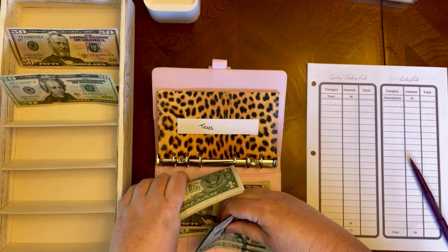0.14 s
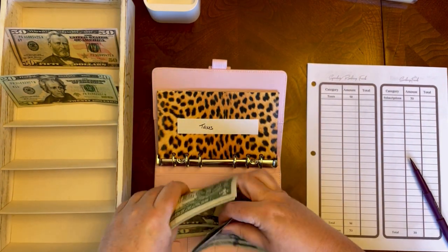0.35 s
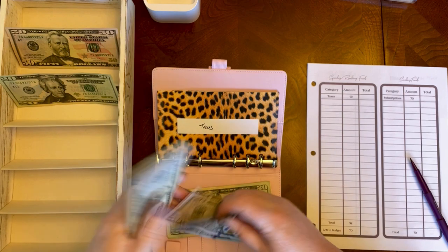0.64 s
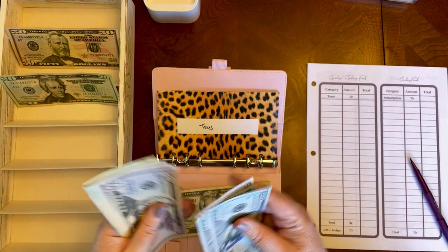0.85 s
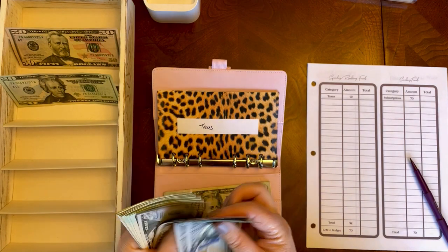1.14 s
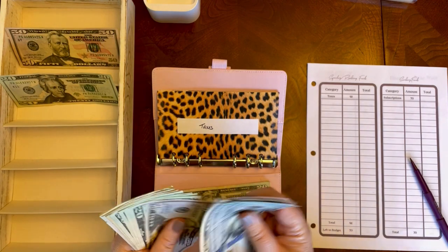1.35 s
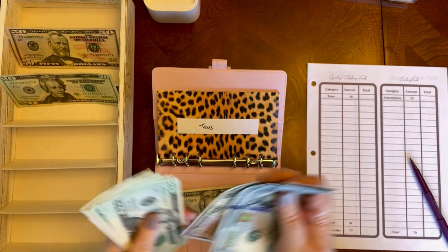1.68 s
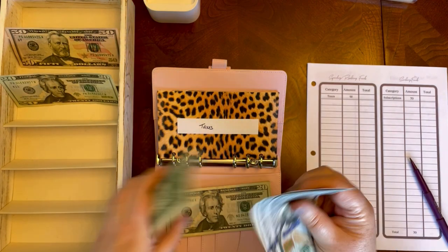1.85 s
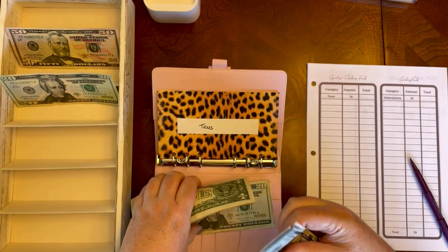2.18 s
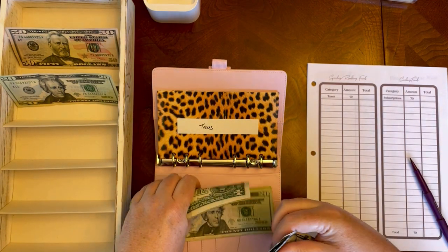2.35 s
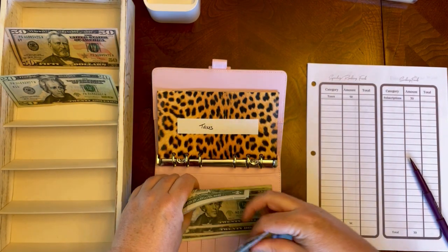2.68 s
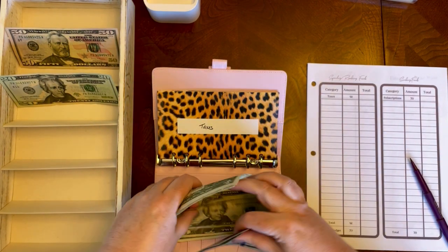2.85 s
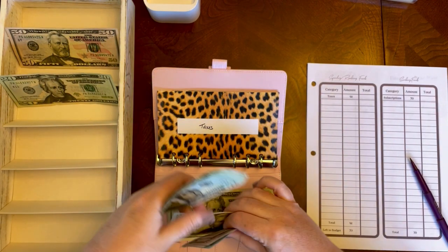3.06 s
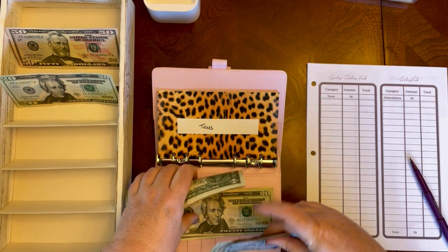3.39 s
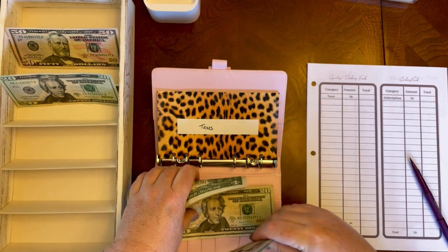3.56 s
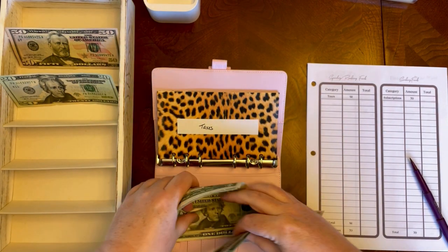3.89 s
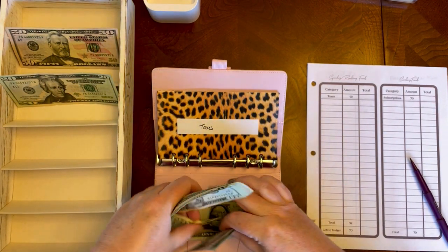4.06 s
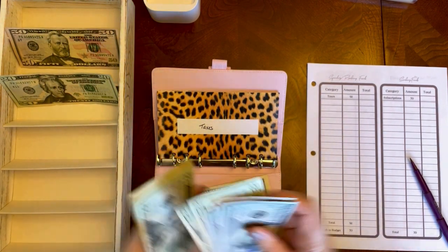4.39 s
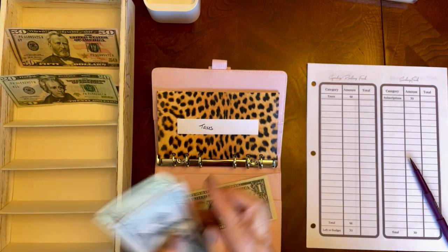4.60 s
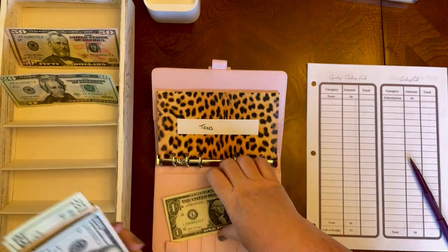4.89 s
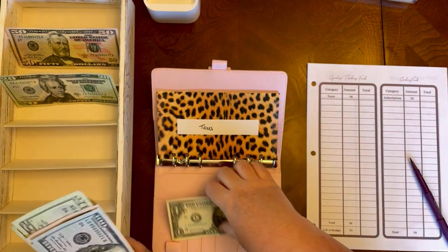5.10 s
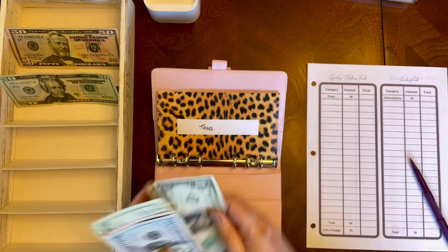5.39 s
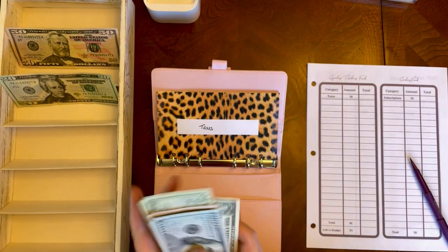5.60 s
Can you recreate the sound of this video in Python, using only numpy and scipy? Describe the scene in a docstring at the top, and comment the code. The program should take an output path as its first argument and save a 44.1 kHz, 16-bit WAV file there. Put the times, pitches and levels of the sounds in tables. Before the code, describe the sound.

Close dry rustling and snapping of paper money being sorted by hand, with a few finger taps and a soft steady appliance hum.

```python
"""Banknotes are sorted by hand over a binder on a table, close to the listener in a quiet room.
Throughout, wavering tones make an appliance hum, and filtered noise makes the air and a soft rustle.
From the start, notes slide and crinkle (random catches and pops) and scrape (resonances); a faint thin
whistle (a wavering, sinking tone) comes and goes. Snaps (noise bursts through three resonances) follow,
loudest near 0.6 and 1.5 s, and creases pop. Fingers tap the binder (ringing tones, a click) from 0.6 s."""
import sys
import numpy as np
from scipy import signal
from scipy.fft import rfft, irfft
from scipy.io import wavfile
from scipy.ndimage import uniform_filter1d

SR = 44100
rng = np.random.default_rng(int(sys.argv[2]) if len(sys.argv) > 2 else 0)


def store_pcm(level_fs):
    """Save levels as 16-bit WAV."""
    pcm = np.round(np.clip(level_fs, -1, 1) * 32767).astype(np.int16)
    wavfile.write(sys.argv[1], SR, np.atleast_2d(pcm).T)


N = 253134
TIME = np.arange(N) / SR


def from_db(db):
    """Turn decibels into a gain."""
    return np.exp(np.asarray(db) * (np.log(10) / 20))


def rms_one(x):
    """Scale a sound to an average (rms) strength of 1."""
    return x / np.sqrt(np.mean(x ** 2) + 1e-20)


def at_hz(points, hz):
    """Read a spectrum between its points, on a log-frequency axis."""
    f, db = np.transpose(points)
    return np.interp(np.log(np.maximum(hz, 1)), np.log(f), db)


def drift(rate):
    """Wander at random with strength 1, taking a new target rate times a second."""
    knots = rng.standard_normal(int(N / SR * rate) + 2)
    return rms_one(np.interp(TIME * rate, np.arange(len(knots)), knots))


def cut(x, hz, kind, order=2):
    """Keep only part of the pitch range (Butterworth filter)."""
    return signal.sosfilt(signal.butter(order, hz, kind, fs=SR, output="sos"), x)


def band(x, hz, ratio):
    """Let through a broad resonance from hz / ratio to hz * ratio."""
    return cut(x, [hz / ratio, hz * ratio], "band")


def resonate(x, hz, width_hz):
    """Ring at one pitch; white noise comes out equally strong at any width."""
    r, w = np.exp(-np.pi * width_hz / SR), 2 * np.pi * hz / SR
    ringing = signal.lfilter([1, 0, -1], [1, -2 * r * np.cos(w), r * r], x + 1e-18)
    return ringing * np.sqrt(1 - r)


def colour(x, spectrum, size=8192):
    """Filter a sound to follow a spectrum, responding as early as possible (minimum phase)."""
    gains = from_db(at_hz(spectrum, np.fft.rfftfreq(size, 1 / SR)))
    cepstrum = irfft(np.log(gains))
    # fold the mirrored half forward so that nothing sounds before its cause
    cepstrum[1:size // 2] *= 2
    cepstrum[size // 2 + 1:] = 0
    return signal.fftconvolve(x, irfft(np.exp(rfft(cepstrum))))[:len(x)]


def add(out, s, sound):
    """Mix a short sound in at time s."""
    at = max(round(s * SR), 0)
    out[at:at + len(sound)] += sound[:max(N - at, 0)]


# tones of the appliance motor: pitch_hz, level_db (rms, before wavering)
HUM_TONES = [(55.5, -47), (117.2, -50.5), (145.3, -54), (234.4, -57.5), (351.5, -54)]


def hum(waver_db=1.0, wander_rad=0.05):
    """Motor and mains tones, each wavering a little in level and phase."""
    out = np.zeros(N)
    for hz, db in HUM_TONES:
        gain = np.sqrt(2) * from_db(db + waver_db * drift(7))
        phase = 2 * np.pi * (hz * TIME + rng.random()) + wander_rad * drift(14.0)
        out += gain * np.sin(phase)
    return out


# colour of the air in the room: pitch_hz, level_db (per hertz, relative)
AIR_COLOUR = [(30, -19.5), (48, 0), (75, 4.5), (105, -5.5), (140, -4), (190, -8.5), (330, -10.5),
              (520, -15.5), (2600, -24.2), (3800, -31), (11000, -38), (16000, -42)]


def room_air(level_db=-47.5):
    """Steady air noise: random pressure, strongest in the bass."""
    return from_db(level_db) * rms_one(colour(rng.standard_normal(N), AIR_COLOUR))


# colour of the handled paper: pitch_hz, level_db (per hertz, relative)
PAPER_COLOUR = [(300, -4.5), (620, -2), (1000, -2.5), (1540, 0.6), (3000, 2.2), (3800, -3), (4300, -3),
                (5400, -1.3), (7800, -3), (10000, -8), (12500, -12), (15000, -12.5)]


def through_paper(x):
    """The paper strengthens some pitches and weakens others."""
    return colour(x, PAPER_COLOUR)


def stroke(start, length, attack_s=0.024, release_s=0.015):
    """A stroke of the hand speeds up, holds and dies away."""
    attack = np.clip((TIME - start) / attack_s, 0, 1)
    return attack * np.exp(-np.clip((TIME - start - length) / release_s, 0, 20))


# one note slides over another: start_s, length_s, level_db (before each layer's trim),
# brightness_db (treble over bass, before the tilt that rubbing shapes)
SLIDING_STROKES = [(0.025, 0.064, -45, 0), (0.117, 0.28, -51, -2.5), (0.481, 0.076, -43, -3.5),
                   (0.568, 0.066, -44, 7), (0.765, 0.16, -52, 6), (0.938, 0.096, -49.5, 1),
                   (1.014, 0.13, -41, 4.5), (1.065, 0.029, -38, 9), (1.134, 0.14, -45.5, 3.5),
                   (1.276, 0.16, -47.5, 7), (1.467, 0.14, -40.5, -8), (1.486, 0.083, -38, 12.5),
                   (1.61, 0.22, -51.5, 7), (1.684, 0.036, -45, 9.5), (1.755, 0.022, -48, 14),
                   (1.902, 0.04, -56, 8), (2.211, 0.13, -50.5, -0.5), (2.265, 0.035, -44.5, -2),
                   (2.359, 0.024, -48, 5), (2.719, 0.089, -46.5, -12.5), (2.798, 0.14, -50, 0),
                   (2.961, 0.057, -45, -1), (3.047, 0.11, -47.5, 6), (3.109, 0.097, -46, 1),
                   (3.325, 0.034, -54.5, -1), (3.432, 0.021, -47.5, -3), (3.824, 0.13, -48, 0.5),
                   (3.954, 0.065, -48, 11.5), (4.067, 0.066, -50, 9), (4.192, 0.029, -46, 7.5),
                   (4.217, 0.34, -53.5, 11.5), (4.447, 0.039, -36.5, 6.5), (4.519, 0.049, -42.5, 7),
                   (4.643, 0.22, -60.5, 13), (5.059, 0.073, -43, -1), (5.128, 0.14, -51.5, -1),
                   (5.349, 0.058, -47, 6), (5.416, 0.077, -40.5, -2.5), (5.514, 0.028, -37, 0),
                   (5.55, 0.02, -36.5, 0), (5.614, 0.039, -44.5, 2), (5.7, 0.039, -40.5, -1.5)]


def sliding(hold_db=-58):
    """Add up the power of all strokes over a soft, steady rustle; give level and brightness in dB."""
    power, bright = from_db(hold_db) ** 2, 0
    for start, length, db, brightness in SLIDING_STROKES:
        push = (from_db(db) * stroke(start, length)) ** 2
        power = power + push
        bright = bright + push * brightness
    return 10 * np.log10(power), bright / power


def friction(catches_per_s, spread_db, smooth):
    """Fibres catch and let go at random, over the smooth hiss of countless finer contacts."""
    sizes = from_db(spread_db * np.minimum(rng.exponential(1, N), 4))
    catches = (rng.random(N) < catches_per_s / SR) * sizes * rng.choice([-1, 1], N)
    return rms_one(rms_one(catches) + smooth * rng.standard_normal(N))


def rubbing(level, brightness, level_db=-1.0, judder_db=1.53, flex_db=2.16, pivot_hz=3500,
            lean=0.75, steepness=1.18, sizzle=0.12, gentle_db=-47, count=16):
    """Notes slide under uneven pressure: pressed strokes are dull, quick light ones bright."""
    faces = []
    for _ in range(2):
        fibres = friction(catches_per_s=3000, spread_db=2.0, smooth=0.71)
        faces.append(rms_one(through_paper(fibres)))
    edges = np.geomspace(400, 17000, count + 1)
    out = np.zeros(N)
    for k in range(count):
        hz = np.sqrt(edges[k] * edges[k + 1])
        tilt = lean * np.tanh(steepness * np.log(hz / pivot_hz)) * brightness
        # a hard stroke tears the fibres apart faster, which lifts the top; a gentle one has less
        top = sizzle * max(np.log2(hz / (2 * pivot_hz)), 0) * (level - gentle_db)
        # the sheet's resonances come and go as it bends between the fingers
        flex = flex_db * drift(45)
        # neighbouring bands take turns between the two faces
        out += cut(faces[k % 2], edges[k:k + 2], "band") * from_db(tilt + top + flex)
    return out * from_db(level + level_db + judder_db * drift(110))


def crinkles(level, brightness, smoothing=0.25, per_s=170, level_db=-6.5, spread_db=0.5, q=1.3,
             pop_s=0.00089, low_hz=1200, high_hz=9000, count=10):
    """Small creases pop at random, each a brief crunch at one pitch; pressed strokes crinkle most."""
    sizes = from_db(spread_db * np.minimum(rng.exponential(1, N), 3))
    creases = sizes * (rng.random(N) < per_s / SR)
    dealt = rng.integers(0, count, N)  # which pitch each crease gets
    grit, out = rng.standard_normal(N), np.zeros(N)
    for k, hz in enumerate(np.geomspace(low_hz, high_hz, count)):
        crunch = signal.lfilter([1], [1, -np.exp(-1 / (pop_s * SR))], creases * (dealt == k) + 1e-18)
        out += resonate(crunch * grit, hz, hz / q)
    return rms_one(through_paper(out)) * from_db(level + level_db - smoothing * brightness)


# a note's edge scrapes along a bowed note: start_s, length_s, level_db
EDGE_SCRAPES = [(0.043, 0.077, -53), (2.239, 0.045, -46.5), (3.311, 0.072, -52.5), (3.428, 0.027, -52)]
# the bowed note's resonances: pitch_hz, width_hz, level_db (relative)
BOWED_RESONANCES = [(2510, 260, -14), (3240, 160, -1), (5140, 280, 2), (7200, 240, -2.5)]


def scrapes():
    """The catching edge sets the bowed note singing faintly."""
    edge = friction(catches_per_s=1400, spread_db=3.0, smooth=0.5)
    note = rms_one(sum(from_db(db) * resonate(edge, hz, width) for hz, width, db in BOWED_RESONANCES))
    return note * sum(from_db(db) * stroke(start, length) for start, length, db in EDGE_SCRAPES)


# a faint thin whistle: start_s, length_s, pitch_hz (mid-whistle, before wobble),
# level_db (of the tone's peak, before flutter)
FAINT_WHISTLES = [(0.07, 0.092, 4450, -58), (0.148, 0.25, 4140, -53.5), (0.41, 0.094, 3970, -50),
                  (3.4, 0.25, 4100, -60.5), (3.66, 0.079, 3880, -58.5)]


def whistles(sag_hz_per_s=120, waver_hz=18, rough_hz=90, flutter_db=2.6, fade_s=0.014):
    """A faint thin whistle near 4 kHz, wavering and sinking in pitch."""
    out = np.zeros(N)
    wobble_hz = waver_hz * drift(50) + rough_hz * drift(970)
    flutter = flutter_db * drift(55)
    for start, length, hz, db in FAINT_WHISTLES:
        on = (TIME >= start) & (TIME < start + length)
        t = TIME[on] - start
        pitch = hz - sag_hz_per_s * (t - length / 2) + wobble_hz[on]
        swell = np.clip(np.minimum(t, length - t) / fade_s, 0, 1)
        tone = np.sin(2 * np.pi * np.cumsum(pitch) / SR)
        add(out, start, from_db(db + flutter[on]) * swell * tone)
    return out


def slips(slip_s, abrupt_s=0.0011, rise_share=0.44, ring_s=0.0035, ring_db=-13, size=1024, count=17):
    """A rush of tiny slips swells and dies; an abrupt buckle starts with a crack."""
    t = TIME[:size]
    fall = np.exp(-(t / (2 * slip_s)) ** 2) + from_db(ring_db) * np.exp(-t / ring_s)
    rush = fall * (1 - np.exp(-t / (rise_share * slip_s)))
    crack = (abrupt_s / slip_s) ** 2 * (t == 0)
    force = rfft(rng.standard_normal(size) * rush + crack)
    # spread the force evenly over all pitches
    even = force / np.sqrt(uniform_filter1d(np.abs(force) ** 2, count))
    return irfft(even) * (t < t[-1] / 2)


# a note buckles or flicks free: start_s, level_db, crispness_db (edge over crease), slip_s,
# crease_pitch_hz, free_edge_pitch_hz
NOTE_FLICKS = [(0.082, -39.5, -3, 0.0018, 2430, 5800), (0.418, -34.5, 12, 0.0012, 2810, 8400),
               (0.5048, -29, 3, 0.0018, 2220, 3160), (0.534, -27, -7.5, 0.005, 2780, 11800),
               (0.5458, -25.5, -2, 0.00076, 1430, 2280), (0.5881, -17, 13, 0.00051, 3230, 6800),
               (0.683, -36.5, 2, 0.0017, 2800, 10300), (0.995, -39, 5, 0.0011, 3120, 3400),
               (1.04, -25.5, 10, 0.00099, 2200, 5300), (1.0826, -32.5, -4.5, 0.0008, 2110, 7700),
               (1.136, -33.5, -10, 0.0013, 1890, 7800), (1.4053, -35.5, -10, 0.0031, 3270, 8000),
               (1.4696, -17.5, 4, 0.0011, 2240, 8050), (1.5589, -29.5, 0, 0.0021, 2660, 5400),
               (2.4016, -37, -1.5, 0.0032, 2320, 8200), (2.8475, -39.5, 7, .0014, 2330, 5000),
               (2.9183, -34, 7.5, 0.0011, 2500, 10200), (2.9935, -35.5, 7, 0.0018, 3040, 8900),
               (3.1208, -32.5, -12, 0.00085, 2440, 9000), (3.1374, -22, 3, 0.00061, 2290, 4970),
               (3.1776, -30.5, -2, 0.00041, 2100, 4300), (3.5509, -31, 4.5, 0.0012, 3240, 8200),
               (4.186, -38.5, 1, .004, 1470, 2870), (4.2023, -38.5, -1, 0.00074, 1380, 2630),
               (4.5354, -37, 18, .0004, 3490, 8700), (4.7271, -30, 9, 0.0006, 2020, 6700),
               (5.0479, -38.5, -3, 0.002, 2560, 6000), (5.4515, -28.5, -4, 0.00072, 3060, 4400),
               (5.542, -30, 18, 0.0019, 1860, 7200)]


def snaps(body_hz=980, body_db=-4.5, length_s=0.0065, size=1024):
    """Each buckle drives sheet, crease and free edge; gives near snaps and even cracks for the room."""
    direct, scattered = np.zeros(N), np.zeros(N)
    single_click = 1. * (TIME[:size] == 0)
    for s, flick_db, crisp_db, slip_s, crease_hz, edge_hz in NOTE_FLICKS:
        # the broad sheet gives body; its level is relative to the crease
        shares = from_db([body_db, 0, crisp_db])
        gains = from_db(flick_db) * np.sqrt(length_s * SR) * shares / np.linalg.norm(shares)
        for out, force in (direct, slips(slip_s)), (scattered, single_click):
            sheet = through_paper(force)
            # each resonance's width is its upper edge over its centre
            parts = band(sheet, body_hz, 1.69), band(sheet, crease_hz, 1.146), band(sheet, edge_hz, 1.61)
            add(out, s, sum(gain * part / np.linalg.norm(part) for part, gain in zip(parts, gains)))
    return direct, scattered


# a single small crease pops inside a rustle: start_s, level_db, pitch_hz
CREASE_POPS = [(0.393, -48, 2000), (1.267, -38.5, 5800), (1.4795, -25.5, 2380), (1.821, -42.5, 3180),
               (2.107, -47, 1820), (2.76, -42, 2500), (2.7915, -43.5, 1490), (2.798, -44.5, 7560),
               (2.8142, -43, 1640), (3.462, -42.5, 5500), (3.886, -45, 2720), (4.2476, -39.5, 2070),
               (5.025, -39.5, 8050), (5.04, -48, 4500), (5.1934, -39.5, 2040), (5.411, -41, 6800),
               (5.49, -31.5, 2580)]


def pops(slip_s=0.0013, ratio=1.35, length_s=0.0039):
    """The clearest creases: each gives way at once and rings briefly at one broad pitch."""
    out = np.zeros(N)
    for s, db, hz in CREASE_POPS:
        crease = band(through_paper(slips(slip_s)), hz, ratio)
        add(out, s, from_db(db) * np.sqrt(length_s * SR) * crease / np.linalg.norm(crease))
    return out


# a finger taps the binder: start_s, level_db (of the knock; the nail follows half of it)
FINGER_TAPS = [(0.588, -24), (3.283, -30), (3.37, -30), (4.2034, -28.5), (4.864, -14.5)]
# ringing of the binder's cover: pitch_hz, level_db (relative), t60_s (time to fall 60 dB at damping 1)
COVER_MODES = [(283, -5, 0.013), (987, -0.5, 0.01)]


def taps(damping=1, nail_db=-23, nail_s=0.0037, size=2048):
    """The nail clicks and the fingertip rings the cover; more damping makes its tones broader."""
    out, knock, t = np.zeros(N), np.zeros(size), TIME[:size]
    for hz, db, t60 in COVER_MODES:
        knock += from_db(db - 60 * damping * t / t60) * np.sin(2 * np.pi * hz * t)
    knock = cut(knock, [450, 2500], "band")
    for s, db in FINGER_TAPS:
        nail = through_paper(rng.standard_normal(size) * np.exp(-t / nail_s))
        add(out, s, from_db(db) * knock + from_db(nail_db + .5 * db) * nail)
    return out


def room(x, t60_s=0.35, first_s=0.00212, wall_hz=9000):
    """Scattered reflections from the table and walls die away quickly."""
    t = TIME[:SR // 2]
    noise = cut(rng.standard_normal(len(t)), wall_hz, "low", order=1)
    tail = noise * from_db(-60 * t / t60_s) * (t > first_s)
    return signal.fftconvolve(x, tail / np.sqrt(np.sum(tail ** 2)))[:N]


def scene(room_db=-12.5, tap_room_db=-9):
    """Close paper, a faint whistle and their reflections over the steady room."""
    level, brightness = sliding()
    handling = rubbing(level, brightness) + crinkles(level, brightness) + scrapes() + pops()
    sustained = handling + whistles()
    flicks, scattered = snaps()
    knocks = taps()
    # the whole binder thuds into the room, more broadly than the spot under the finger
    thuds = taps(damping=2)
    reflections = room(from_db(room_db) * (sustained + scattered) + from_db(tap_room_db) * thuds)
    return (sustained + knocks + flicks + reflections + room_air() + hum())[None]


def record(dry, cutoff_hz=16100):
    """Cut the top of the treble steeply."""
    return signal.sosfilt(signal.ellip(10, .1, 80, cutoff_hz, fs=SR, output="sos"), dry)


dry = scene()
out = record(dry)
store_pcm(out)
```